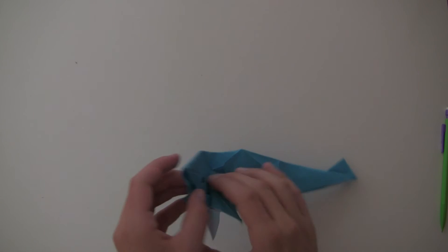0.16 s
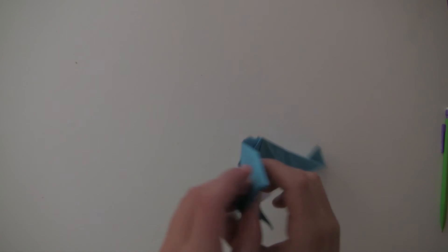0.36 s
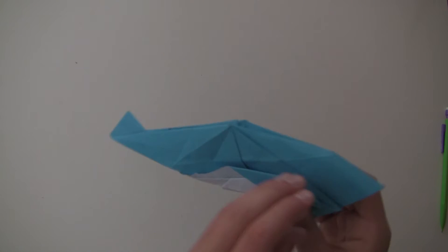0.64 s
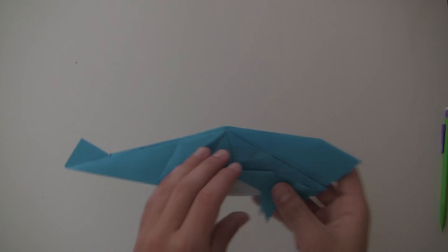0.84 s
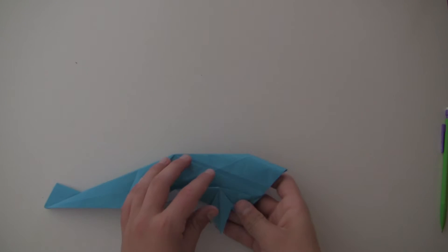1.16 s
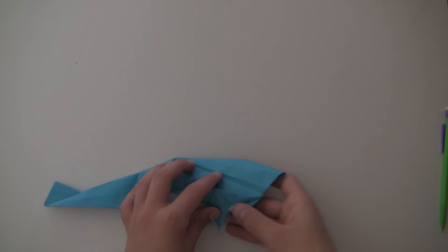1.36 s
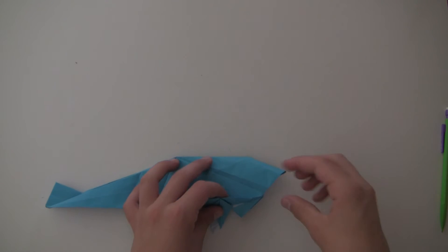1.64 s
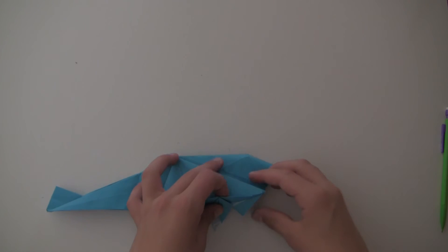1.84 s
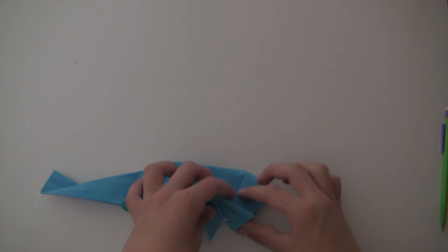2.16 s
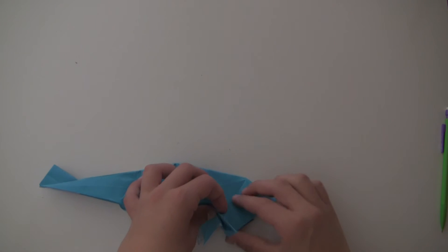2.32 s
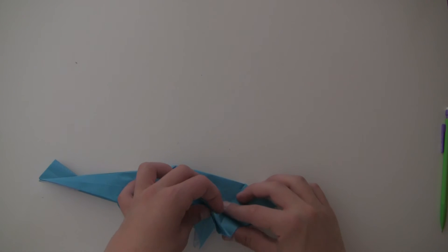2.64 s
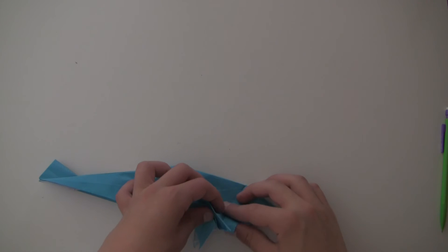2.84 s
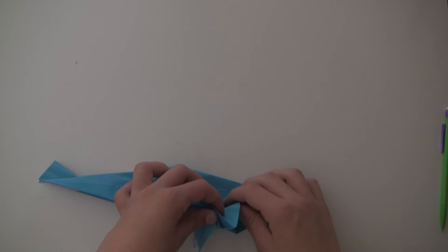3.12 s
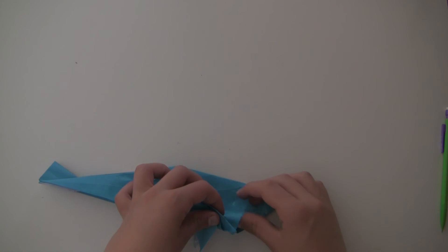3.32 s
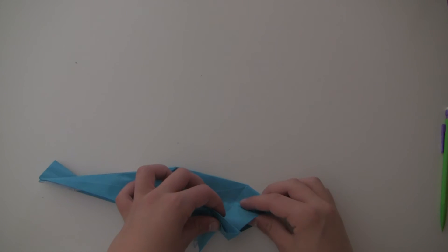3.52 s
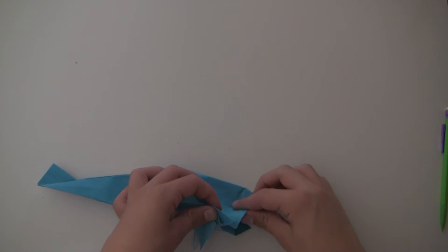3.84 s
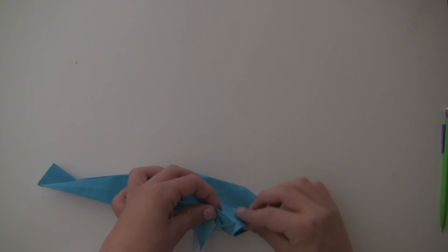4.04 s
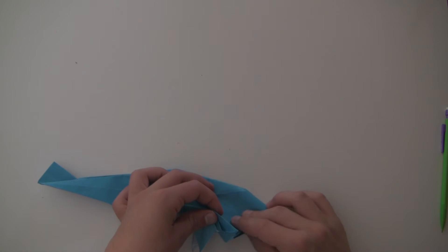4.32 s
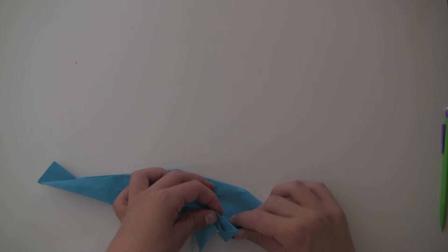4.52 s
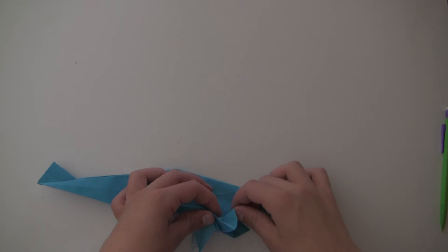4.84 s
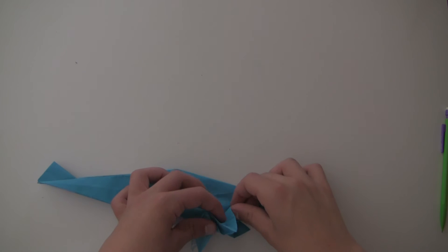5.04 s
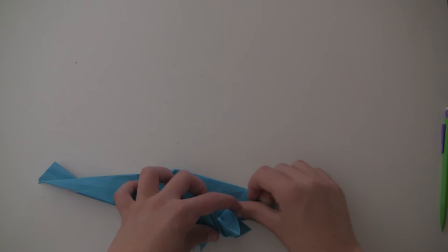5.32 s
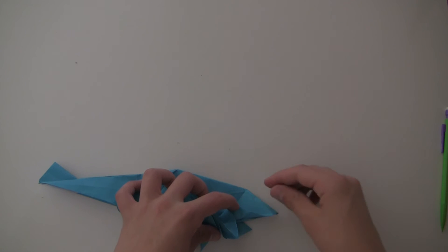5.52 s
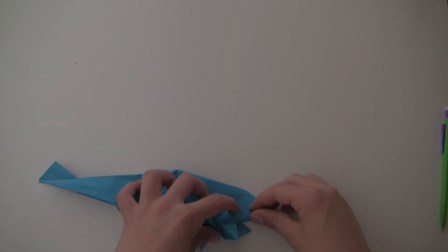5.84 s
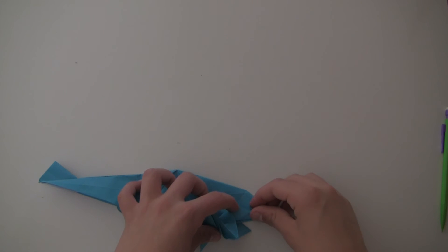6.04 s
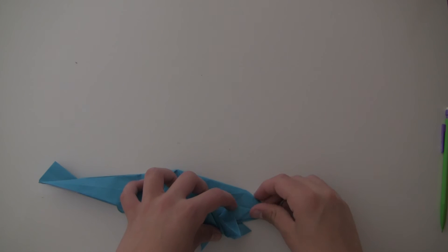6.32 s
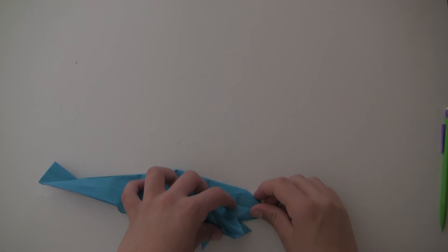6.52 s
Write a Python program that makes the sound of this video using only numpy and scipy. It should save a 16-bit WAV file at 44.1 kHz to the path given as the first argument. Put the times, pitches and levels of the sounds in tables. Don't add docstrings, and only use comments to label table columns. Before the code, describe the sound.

Hands turn and crease a stiff paper figure on a table. A few faint crackles and a light rustle come first, then a near-quiet gap, then a dense burst of sharp snaps just after one second. Irregular crackling, ticks and rustling continue, with soft low wrist thumps. Close stereo microphone, small quiet room, steady hiss.

```python
import sys
import numpy as np
from scipy import signal
from scipy.fft import rfft, irfft, next_fast_len
from scipy.io import wavfile
from scipy.ndimage import uniform_filter1d

SR = 44100
rng = np.random.default_rng(int(sys.argv[2]) if len(sys.argv) > 2 else 0)


def ratio_of_db(decibels):
    return 10 ** (np.asarray(decibels, float) / 20)


def materialize(psi):
    bounded = np.clip(np.atleast_2d(psi).T, -1, 1)
    quanta = np.round(bounded * 32767).astype(np.int16)
    wavfile.write(sys.argv[1], SR, quanta)


N = 294147
PADDED = next_fast_len(N)


# (time [s], facet level over 2 ms [dB], facet ring [Hz], overtone [dB rel])
CRISP_CREASES = [(0.1049, -30.5, 1770, 2), (0.1464, -36.5, 2240, 2), (1.1381, -50, 3140, 14.5),
                 (1.1721, -33.5, 2230, 0), (2.905, -40, 3000, 1), (1.2984, -27.5, 2500, 0.5),
                 (1.3273, -32, 3170, 0), (1.5785, -21.5, 2500, -4), (1.868, -27, 2660, -4.5),
                 (1.8749, -29, 2570, 0), (1.9292, -28, 2930, 5.5), (2.1408, -32.5, 2540, 4.5),
                 (2.1925, -22, 2580, -0.5), (2.559, -31, 2940, -2.5), (2.912, -22, 3300, 3),
                 (2.916, -37.5, 2770, 14), (3.1456, -26.5, 2400, 5.5), (3.955, -23.5, 2760, -9.5),
                 (3.96, -46, 2540, 18.5), (4.126, -31, 3020, -9), (4.5273, -36, 2730, -12),
                 (4.6784, -28.5, 3100, -4), (5.381, -23.5, 3060, 5), (5.9991, -35.5, 3470, 2.5),
                 (6.1599, -31.5, 3760, -8), (6.1786, -34.5, 3200, 0), (6.5734, -37, 3550, -2.5)]
# (time [s], facet level over 2 ms [dB], facet ring [Hz], overtone [dB rel])
PADDED_CREASES = [(0.0342, -42, 2500, 8), (.9001, -37, 3930, -9), (1.2577, -20, 2350, -2.5),
                  (1.2922, -32, 2100, 3), (1.3612, -34, 2370, 5.5), (1.3663, -26, 2660, -9),
                  (1.9971, -27.5, 2650, -6.5), (2.3108, -28.5, 3000, -8.5), (2.4972, -37, 2620, -4),
                  (2.9003, -29.5, 2420, 12), (1.251, -27, 2470, -3), (3.303, -36.5, 1570, 0.5),
                  (3.357, -37, 2830, -2), (3.6407, -27.5, 2630, -23), (3.703, -36.5, 3520, 2.5),
                  (3.9798, -33, 2740, 3), (4.2242, -37.5, 2970, -2), (4.6174, -41.5, 2110, 0.5),
                  (4.803, -38, 1590, -7), (4.895, -33, 2330, -10), (4.9299, -29, 2240, -15),
                  (5.2356, -32, 2660, -5), (5.245, -29, 3160, -3), (6.2502, -46, 3250, 4.5),
                  (6.355, -24.5, 2310, 0.5), (6.372, -39, 3500, 12.5), (6.39, -27, 3020, 0.5),
                  (3.775, -33.5, 2340, 12), (4.9699, -24.5, 2820, -10), (5.0929, -30.5, 3120, -3.5)]
CRISP_EDGE_DB, MUFFLED_EDGE_DB = -2, -7.5
FLAP_DB, OVERTONE_RATIO = -17.5, 2.02


def creases():
    out = np.zeros((2, N))
    rows = [(*row, CRISP_EDGE_DB) for row in CRISP_CREASES]
    rows += [(*row, MUFFLED_EDGE_DB) for row in PADDED_CREASES]
    for (s, db, hz, small_db, edge_db), noise in zip(rows, rng.standard_normal((len(rows), 3, 400))):
        facet = ringing(burst(noise, .35, .0013), hz, 1300, 4000)
        small = ringing(burst(noise, 1.0, .0014), OVERTONE_RATIO * hz, 4000, 8500)
        edge = sized(band(burst(noise, 4, .0017), 8000, 12500))
        flap = ratio_of_db(FLAP_DB) * sized(band(burst(noise, .3, .0014), 450, 1200))
        overtones = ratio_of_db(small_db) * (small + ratio_of_db(edge_db) * edge)
        add(out, s - .0008, ratio_of_db(db) * (facet + flap + overtones))
    return out


# (time [s], level over 2 ms [dB], ring [Hz])
LOOSE_FLAPS = [(.0325, -37.5, 1340), (.1048, -40, 1470), (.1941, -42.5, 1461), (1.1717, -40, 1340),
               (1.2983, -29, 1410), (1.3287, -35, 1180), (1.3611, -37, 1320), (2.0611, -37, 990),
               (2.398, -36, 1500), (2.9005, -34, 1140), (2.9046, -29.5, 1230), (2.911, -30, 1170),
               (3.0201, -38.5, 1030), (3.078, -38, 1000), (3.1464, -31, 1140), (3.302, -36.5, 1280),
               (3.955, -31, 1000), (4.0601, -36, 1060), (4.1352, -38, 940), (4.245, -39.5, 1280),
               (4.5281, -35, 1200), (4.6397, -40.5, 920), (4.7438, -34.5, 1140), (4.8036, -30.5, 1318),
               (4.8955, -33.5, 1251), (4.9297, -31.5, 1240), (4.9698, -22.5, 1700), (4.9735, -41, 1550),
               (5.1817, -36, 1330), (6.3723, -34.5, 1360), (3.955, -38, 945), (3.1462, -30.5, 1030),
               (4.088, -38, 900), (2.192, -33, 700)]
# (time [s], level over 2 ms [dB], ring [Hz])
FACET_POPS = [(0.0235, -42, 2590), (1.23, -35.5, 2340), (1.6554, -40.5, 2520), (1.782, -38.5, 2470),
              (1.8904, -28, 2980), (1.9692, -34, 2500), (1.9924, -34, 2640), (2.076, -36.5, 2800),
              (2.186, -41, 3100), (2.26, -40, 3830), (2.398, -32, 2870), (2.4634, -38, 2900),
              (2.608, -43, 3130), (2.7788, -40, 2080), (2.832, -38, 2920), (3.1958, -35.5, 3300),
              (3.334, -39, 3000), (3.5632, -39.5, 2830), (3.5979, -37, 3000), (3.7552, -41, 2180),
              (4.0671, -38, 2170), (4.091, -39.5, 3230), (4.135, -31, 1960), (4.251, -35.5, 2850),
              (4.402, -33, 3070), (4.827, -33, 2570), (5.0658, -36, 3080), (5.1568, -39, 2940),
              (5.17, -35, 2700), (5.4067, -33.5, 2800)]
# (time [s], level over 2 ms [dB], ring [Hz])
FIBRE_PRICKS = [(0.8086, -40, 6340), (1.262, -29, 4760), (1.3285, -26, 8500), (1.3989, -31.5, 8100),
                (1.9332, -39, 5960), (2.1983, -29.5, 4900), (2.285, -34.5, 7000), (2.8354, -39, 7100),
                (2.961, -35, 5300), (2.982, -38, 5300), (3.1466, -17, 13400), (3.1497, -49, 5250),
                (3.956, -19.5, 9600), (1.28, -28, 5170), (0.8997, -48, 2160), (4.8962, -35.5, 7700),
                (4.97, -26.5, 7400), (2.868, -41, 3800), (2.9275, -40, 3500), (1.579, -31, 5000),
                (3.4256, -35, 7000), (3.7977, -38, 4520), (4.2934, -32.5, 7400), (4.376, -33, 7500),
                (4.9332, -30.5, 5500), (5.41, -36, 6040), (5.4235, -31, 6500), (6.4248, -39.5, 3270),
                (1.2962, -33, 5600), (3.1464, -18.5, 8500), (3.146, -16, 15800), (3.9555, -24, 16000),
                (5.38, -27, 17000), (5.382, -28, 6300), (2.9003, -30, 7000), (2.912, -24, 8300),
                (3.1497, -30, 10000), (6.3533, -28, 7400), (1.333, -33, 7500), (3.96, -33, 5500),
                (2.912, -20, 13500), (2.916, -28, 13500), (5.093, -37, 4700), (1.1372, -37.5, 6950),
                (6.459, -45, 8500), (6.003, -42, 10600), (4.6, -42, 6800), (4.276, -42, 5500),
                (4.5, -45, 2300), (5.491, -45, 4500), (1.19, -46, 4500), (4.9695, -26, 2200),
                (1.579, -28, 2720), (5.9993, -41, 2830)]
# (time
# [s], level over 2 ms [dB], ring [Hz])
SMALL_CRINKLES = [(0.1413, -43, 1890), (0.1506, -43, 3620), (0.152, -40, 3600), (1.2318, -44, 1010),
                  (1.2514, -31, 3880), (1.302, -39, 1100), (1.5215, -46, 2300), (1.7862, -44.5, 650),
                  (1.891, -36, 8440), (1.8907, -39, 1720), (1.9381, -40, 10590), (1.9693, -40, 1700),
                  (1.973, -49, 1770), (2.1858, -43, 1830), (2.1858, -34, 6440), (2.188, -44, 4670),
                  (2.4093, -49, 3340), (2.4635, -43, 6570), (2.6083, -47, 1550), (2.6088, -44, 710),
                  (2.6108, -44, 1400), (2.7793, -45, 1990), (2.8682, -48, 1160), (2.8712, -40, 3360),
                  (2.8717, -42.5, 670), (2.928, -42, 3570), (2.9812, -41, 3490), (3.146, -27, 2500),
                  (3.1546, -30, 12360), (3.1962, -43, 3080), (3.426, -40, 3140), (3.5976, -43, 1460),
                  (3.6417, -43, 6550), (3.9118, -46, 2520), (4.062, -40, 2540), (4.062, -48, 5470),
                  (4.062, -47, 5510), (4.0974, -42, 2390), (4.1259, -40.5, 5000), (4.2212, -46, 2540),
                  (4.225, -43, 1680), (4.2459, -41, 3060), (4.2528, -40, 600), (4.2566, -41, 710),
                  (4.2935, -46, 2610), (4.4006, -40.5, 1150), (4.6966, -42, 4720), (4.8038, -45, 6400),
                  (4.8288, -41, 1100), (4.93, -48, 8510), (4.93, -35, 6870), (4.973, -41, 4870),
                  (4.9769, -45, 8510), (4.9812, -37, 1610), (5.021, -45, 1660), (5.4234, -40, 4890),
                  (5.9994, -42.5, 3510), (6.3554, -34.5, 1210), (6.3722, -36, 3280), (6.4256, -42, 9150)]
CRINKLE_DB, TICK_SLAP = 2.5, .5


def ticks():
    out = np.zeros((2, N))
    crinkles = [(s, db + CRINKLE_DB, hz) for s, db, hz in SMALL_CRINKLES]
    rows = LOOSE_FLAPS + FACET_POPS + FIBRE_PRICKS + crinkles
    for (s, db, hz), noise in zip(rows, rng.standard_normal((len(rows), 3, 400))):
        tick = ringing(burst(noise, hz / 5000, .0014), hz, hz / 2.5, hz * 2.6, TICK_SLAP)
        add(out, s - .0009, ratio_of_db(db) * tick)
    return out


LEAD_CLICK = 2.43


def burst(noise, apart, length_s):
    t = np.arange(noise.shape[1]) / SR / length_s
    hump = (1 - np.exp(-t / .1)) * np.exp(-t ** 2)
    z = rfft(hump * (noise[0] + apart * noise[1:]))
    even = z / (abs(z) + .2 * abs(z).mean())
    out = np.sqrt(hump) * irfft(even, len(t))
    click = np.sign(noise[0, 0]) * LEAD_CLICK * abs(out).max() / (1 + apart)
    return out + click * (np.arange(len(t)) == 3)


SLAP, RING_WIDTH_HZ = .3, 220


def ringing(x, hz, lo_hz, hi_hz, share=SLAP):
    slap = sized(band(x, lo_hz, hi_hz))
    ring = sized(resonate(slap, hz, RING_WIDTH_HZ + .15 * hz))
    return sized(ring + share * slap)


# (start [s], hold [s], rustle level [dB], brightness [dB rel])
FINGER_SPELLS = [(0, 0.27, -56, 5), (.36, 0.071, -59.5, 11), (0.467, 0.072, -49, 0.5),
                 (0.723, 0.32, -55, -0.5), (1.163, 0.067, -48.5, -3), (1.261, 0.22, -44, 0.5),
                 (1.764, 0.18, -52, -2.5), (1.962, 0.11, -44.5, -2), (2.087, 0.59, -49.5, -1.5),
                 (2.768, 0.013, -49.5, 2), (2.863, 0.2, -45.5, -0.5), (3.14, 0.33, -46, 1.5),
                 (3.563, 0.5, -45.5, -1.5), (4.09, 0.3, -48.5, -1), (4.453, 0.095, -55.5, 3),
                 (4.701, 0.052, -46, -6), (4.92, 0.3, -46.5, -4), (5.254, 0.12, -49, 2),
                 (5.407, 0.04, -43.5, -21), (5.76, 0.033, -58.5, -12), (6.01, 0.26, -58, -4),
                 (1.602, .06, -69, -16), (6.383, 0.16, -53, -1)]
GRIP_S, RELEASE_DB_PER_S = 0.044, 157


def handling():
    t = np.arange(N) / SR
    power = np.zeros((2, N))
    for start, hold, db, bright_db in FINGER_SPELLS:
        grip = np.clip((t - start) / GRIP_S + 1, 0, 1)
        release = ratio_of_db(-RELEASE_DB_PER_S * np.maximum(t - start - hold, 0))
        gains = ratio_of_db(np.array([[db], [db + bright_db]]))
        power += (gains * (grip * release)) ** 2
    return np.sqrt(power)


# (frequency [Hz], density [dB per Hz])
SHEET_SPECTRUM = [(240, -57), (400, 3.5), (971, -2), (1620, -3.5), (3650, -2.5), (4190, -2.5), (7230, -0.5),
                  (13500, -15), (15500, -1), (16500, -47)]
CRACKLES_PER_S = 400


def rustle():
    level, bright = handling()
    drift = uniform_filter1d(uniform_filter1d(rng.standard_normal(N), 200), 200)
    clumps = ratio_of_db(4.0 * np.minimum(evened(drift), 2))
    size = ratio_of_db(4.2 * np.minimum(rng.exponential(1, N), 2.8))
    size = size * (rng.random(N) < CRACKLES_PER_S * clumps / SR)
    facet, crackle = rng.integers(0, 16, N), np.zeros((2, N))
    for k in range(16):
        noise = burst(rng.standard_normal((3, 120)), .6, .0006)
        grain = resonate(noise, 1000 * 1.18 ** k, 600 * 1.18 ** k)
        crackle += signal.oaconvolve((size * (facet == k))[None], sized(grain), axes=1)[:, :N]
    both, *own = rng.standard_normal((3, N))
    slide = evened(both + 1.1 * np.array(own)) * clumps ** .45
    sheet = ratio_of_db(-3) * evened(crackle) + slide
    colour = ratio_of_db(read(SHEET_SPECTRUM, np.fft.rfftfreq(PADDED, 1 / SR)))
    sheet = irfft(rfft(sheet, PADDED) * colour, PADDED)[:, :N]
    fizz = evened(band(slide / clumps ** .2, 9000, 16500))
    return ratio_of_db(-3.0) * (level * evened(band(sheet, 400, 8000)) + bright * fizz)


# (time [s], length [s], level [dB], centre [Hz], width [Hz])
FLAP_DRAGS = [(0.031, 0.0056, -31.5, 4600, 6000), (0.14, 0.0053, -38, 3900, 5700),
              (1.7, 0.073, -59, 1750, 460), (2.02, 0.053, -43.5, 3280, 420), (2.178, 0.032, -39, 750, 650),
              (4.69, 0.026, -36.5, 8200, 7700), (4.99, 0.064, -49, 1620, 300),
              (6.347, 0.016, -31, 2800, 5400), (6.35, 0.058, -43.5, 516, 200), (3.1, 0.14, -52, 3100, 650),
              (4.381, 0.063, -41, 10500, 9800), (5.76, .045, -59, 6000, 7600),
              (4.518, 0.023, -46, 5600, 9800), (0.42, 0.049, -53, 6300, 6700),
              (1.864, 0.055, -48, 550, 460), (3.9, 0.072, -46.5, 620, 200), (1.59, 0.075, -55, 4850, 300),
              (.515, .04, -57, 500, 300), (1.256, .018, -48, 680, 300), (2.866, .02, -52, 690, 250),
              (3.955, .02, -48, 1020, 250), (4.932, .014, -51, 740, 250), (6.234, .01, -54, 650, 500),
              (4.745, .025, -52, 1300, 300), (1.173, .012, -46, 3400, 4000), (3.2, 0.21, -50, 14000, 3000),
              (4.977, .011, -41, 1630, 300), (5.25, 0.079, -49, 7000, 4000),
              (5.243, 0.0082, -40, 4500, 6700)]


def drags():
    out = np.zeros((2, N))
    t = np.arange(SR // 4) / SR
    for s, length_s, db, hz, width_hz in FLAP_DRAGS:
        both, *own = rng.standard_normal((3, SR // 4))
        swell = np.sin(np.pi * np.clip(t / length_s, 0, 1) ** 0.77)
        scrape = resonate(both + 0.25 * np.array(own), hz, width_hz)
        add(out, s, ratio_of_db(db) * swell * evened(resonate(scrape, hz, 2 * width_hz)))
    return out


# (time [s], drive [dB])
WEIGHT = [(0.0, -58.5), (0.8, -61), (1.32, -57.5), (1.8, -60.5), (2.08, -56.5), (3.12, -56), (3.6, -56),
          (4.2, -53), (5.05, -58), (5.2, -55.5), (5.7, -60), (6.67, -56)]
# (frequency [Hz], width [Hz], level [dB])
TABLE_MODES = [(130, 6.6, 4.5), (148, 6.4, -3), (188.6, 11.3, 1), (262, 14.6, 5), (351, 3.9, 3),
               (488, 9.4, 2.5), (687.6, 5.3, -4.5)]
# (time [s], level [dB], upper modes [dB rel])
WRIST_KNOCKS = [(1.23, -53, -8), (1.389, -62, -17), (2.19, -44.5, -4.5), (2.239, -69, -8),
                (4.254, -41, -4.5), (4.275, -37, -14), (4.311, -45, -16), (4.344, -45.5, -13),
                (4.53, -50.5, -6.5), (5.27, -54, -8), (5.371, -48, -11), (4.4, -56, -1), (4.895, -51, -11),
                (4.929, -47, -9.5), (5.003, -50.5, -12), (5.079, -52.5, 1.5), (5.181, -48, -3.5),
                (5.225, -47, -26), (5.352, -45, -23), (6.22, -59.5, 5), (6.63, -51, -7)]
PALM_DAMPING, KNOCK_RISE_S = 1.44, 0.0091


def table():
    drive_db, = curves(WEIGHT, np.arange(N) / SR)
    both, *own = rng.standard_normal((3, N))
    pushes = ratio_of_db(drive_db) * (both + 0.95 * np.array(own))
    pressed = sum(ratio_of_db(db) * resonate(pushes, hz, 10.8 * width_hz) for hz, width_hz, db in TABLE_MODES)
    out = evened(pressed) * pushes.std()
    t = np.arange(SR // 4) / SR
    rise = np.minimum(t / KNOCK_RISE_S, 1)
    for s, db, upper_db in WRIST_KNOCKS:
        knock = np.zeros(len(t))
        for hz, width_hz, mode_db in TABLE_MODES:
            decay = np.exp(-np.pi * PALM_DAMPING * width_hz * t)
            knock += ratio_of_db(mode_db + upper_db * (hz > 200)) * decay * np.sin(2 * np.pi * hz * t)
        add(out, s, ratio_of_db(db) * knock * rise * np.ones((2, 1)))
    return out


# (delay [s], level [dB])
TABLE_BOUNCES = [(.0022, -20.5), (.0043, -22), (.0086, -20), (0.0124, -26)]
# (frequency [Hz], t60 [s])
ROOM_T60 = [(300, 0.8), (1500, 0.51), (4000, 0.44), (8000, 0.58), (15000, 0.47)]
ROOM_DB, NEAR_WALL_T60_S = -4, 0.015


def room(x):
    size = SR // 2
    taps = np.zeros((2, size))
    at = np.arange(100, size - 10, 10) + rng.integers(0, 10, (2, (size - 101) // 10))
    np.put_along_axis(taps, at, rng.choice([-1., 1.], at.shape), 1)
    taps[1] += 0.033 * taps[0]
    hz, t, z = signal.stft(taps, SR, nperseg=128)
    near = 1 + 11.0 * ratio_of_db(-60 * t / NEAR_WALL_T60_S)
    decay = ratio_of_db(-60 * t / read(ROOM_T60, hz)[:, None]) * near
    tail = signal.istft(z * decay, SR, nperseg=128)[1]
    tail *= ratio_of_db(ROOM_DB) / np.linalg.norm(tail, axis=1, keepdims=True)
    for delay_s, db in TABLE_BOUNCES:
        tail[[0, 1], round(delay_s * SR) + rng.integers(0, 5, 2)] += ratio_of_db(db)
    return x + signal.fftconvolve(x, tail, axes=1)[:, :N]


# (frequency [Hz], left [dB], right [dB])
PORTS = [(60, -2, -22), (121, -0.5, 0.5), (8980, -1, -2), (12100, -10, -4.5), (15500, -18, -6),
         (16600, -28, -21)]


def microphone(x):
    hz, rows = np.fft.rfftfreq(PADDED, 1 / SR), np.array(PORTS)
    colour_db = np.array([read(rows[:, [0, port]], hz) for port in (1, 2)])
    return irfft(rfft(x, PADDED) * ratio_of_db(colour_db), PADDED)[:, :N]


# (frequency [Hz], density [dB per Hz])
HISS_SPECTRUM = [(12, -44), (20, -22), (108, -10), (190, -9), (239, -7), (556, -18), (658, -14), (758, -21),
                 (1670, -21), (2210, -24), (2690, -21.5), (15400, -32.5), (16800, -60)]
# (frequency [Hz], correlation [-])
HISS_LIKENESS = [(60, 0.062), (300, 0.083), (3000, 0.067), (15000, 0.036)]
HISS_DB, PATCH_DB = -56.5, 0.5


def hiss():
    frames, hz = N // 256 + 5, np.fft.rfftfreq(1024, 1 / SR)
    a, b, c, d, patches = rng.standard_normal((frames, 513, 5)).T
    patches = evened(uniform_filter1d(uniform_filter1d(patches, 12, 0), 14, 1))
    same = np.clip(read(HISS_LIKENESS, hz), -1, 1)[:, None]
    left = a + 1j * b
    right = same * left + np.sqrt(1 - same ** 2) * (c + 1j * d)
    z = np.array([left, right]) * ratio_of_db(read(HISS_SPECTRUM, hz)[:, None] + PATCH_DB * patches)
    return ratio_of_db(HISS_DB) * evened(signal.istft(z, nperseg=1024, noverlap=768)[1][:, :N])


def evened(x):
    return x / np.sqrt(np.mean(x ** 2) + 1e-20)


def sized(x):
    return x * np.sqrt(2 * SR / 500 / (x ** 2).sum())


def read(points, hz):
    f, value = np.transpose(points)
    return np.interp(np.log(hz + 1), np.log(f + 1), value)


def curves(rows, t):
    s, *columns = np.transpose(rows)
    return [np.interp(t, s, c) for c in columns]


def resonate(x, hz, width_hz):
    return signal.lfilter(*signal.iirpeak(hz, hz / width_hz, SR), x)


def band(x, lo_hz, hi_hz):
    sos = signal.butter(3, [lo_hz, min(hi_hz, SR / 2.1)], "band", fs=SR, output="sos")
    return signal.sosfilt(sos, x)


def add(mix, s, sound):
    part = mix[:, max(round(s * SR), 0):][:, :sound.shape[1]]
    part += sound[:, :part.shape[1]]


def scene():
    return room(creases() + ticks() + rustle() + drags()) + table()


def roll_off(x):
    return signal.sosfilt(signal.butter(12, 17100, fs=SR, output="sos"), x)


def record(dry):
    heard = microphone(dry) + hiss()
    return roll_off(heard)


dry = scene()
out = record(dry)
materialize(out)
```